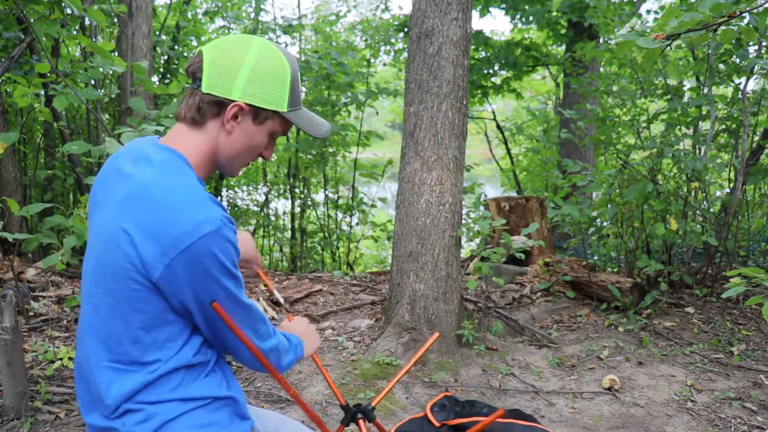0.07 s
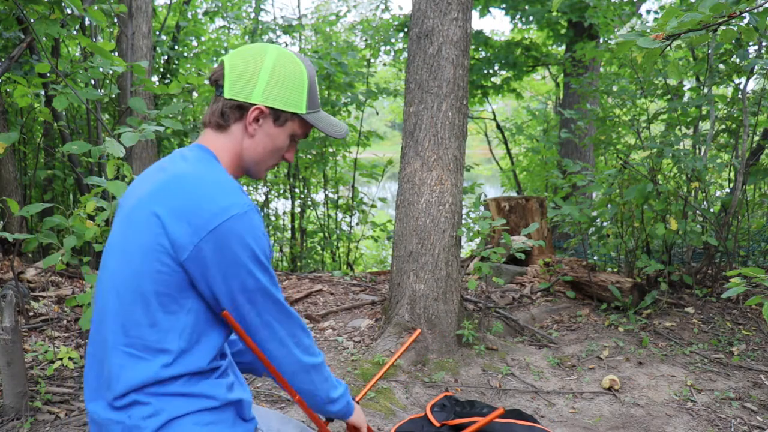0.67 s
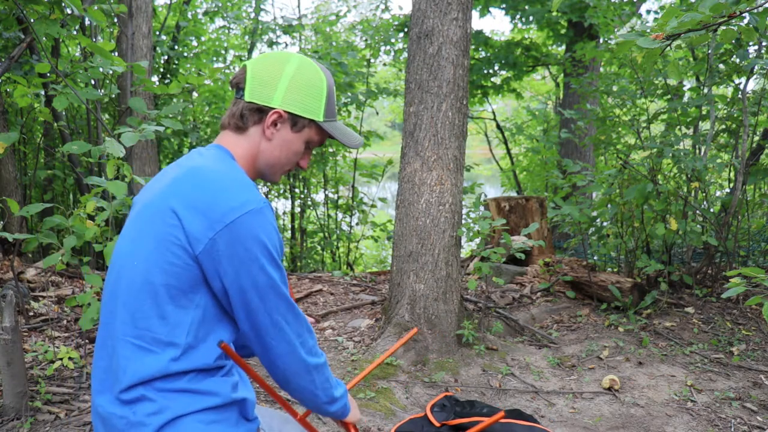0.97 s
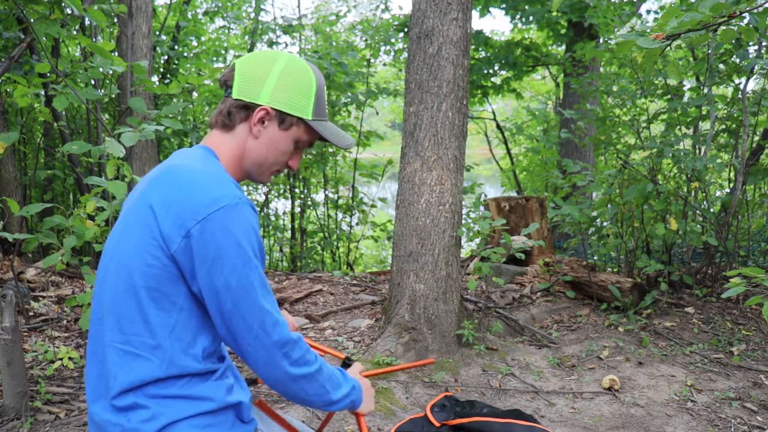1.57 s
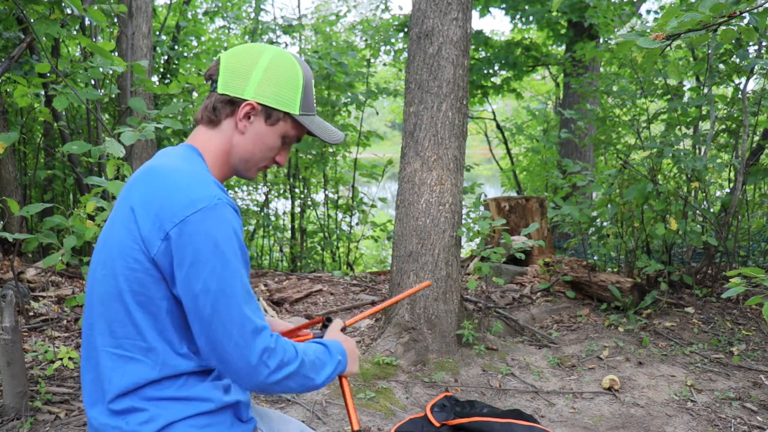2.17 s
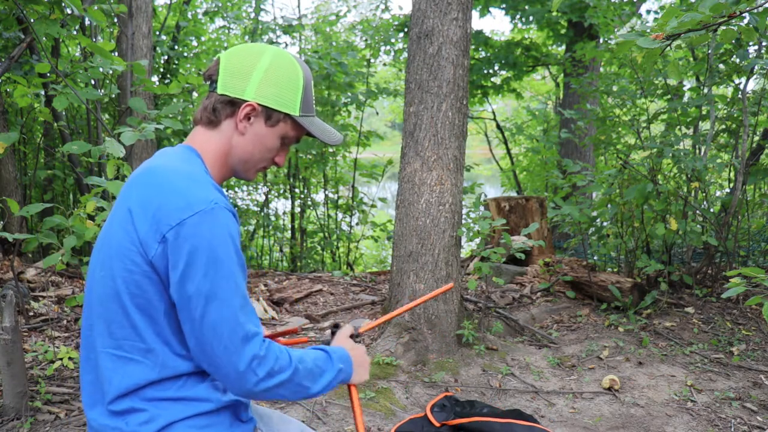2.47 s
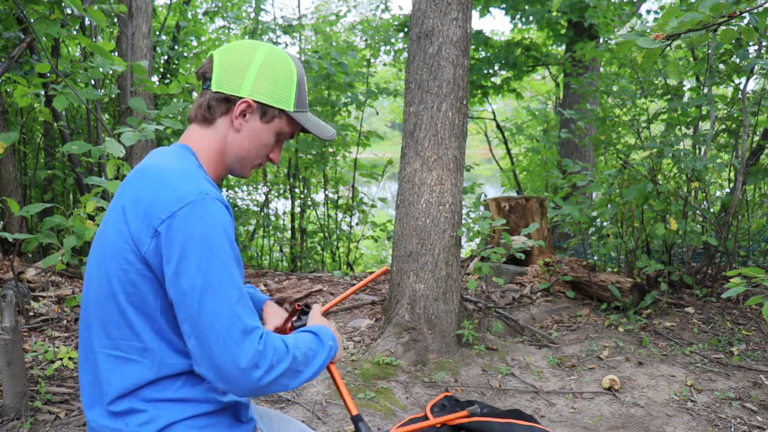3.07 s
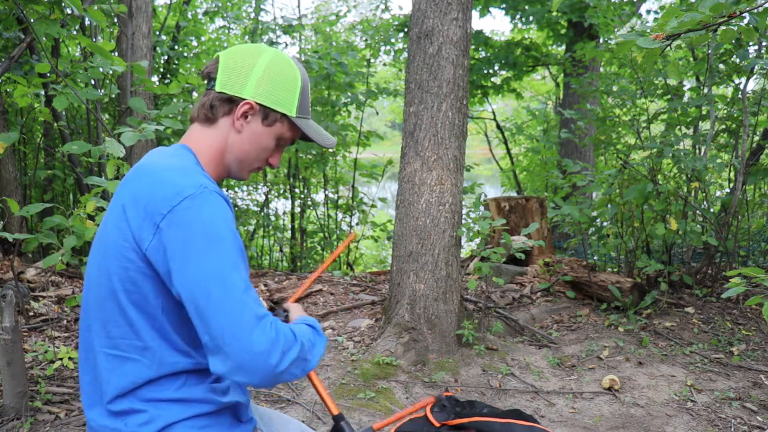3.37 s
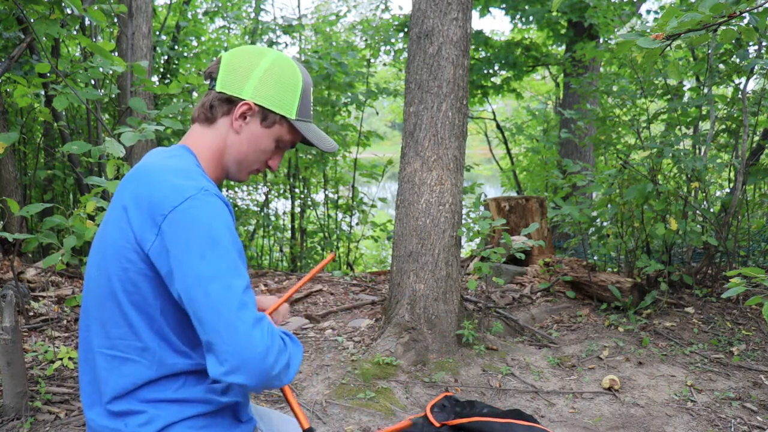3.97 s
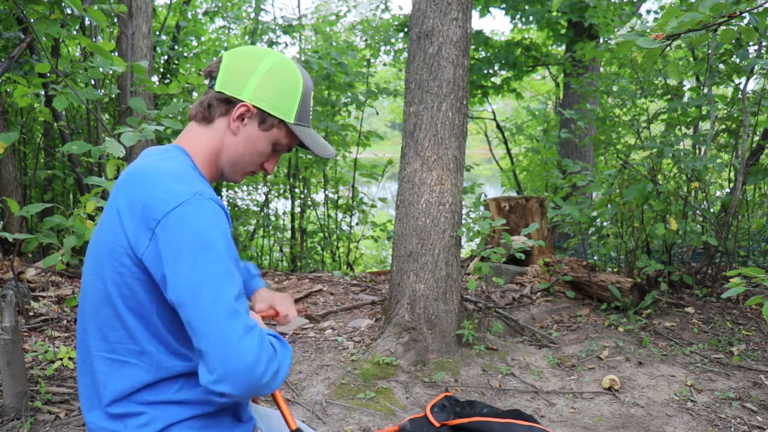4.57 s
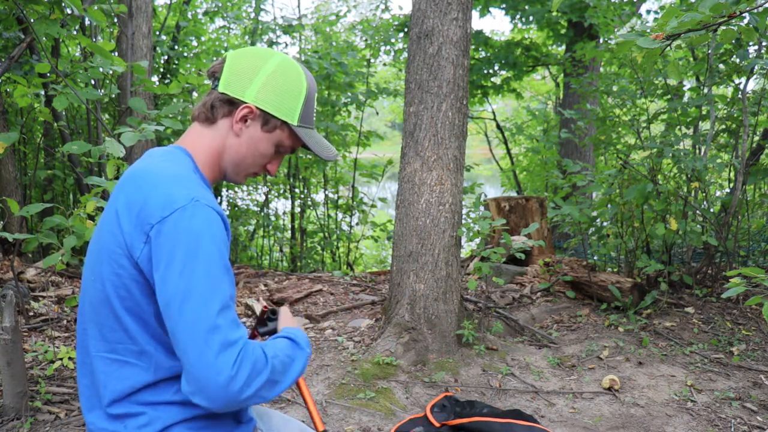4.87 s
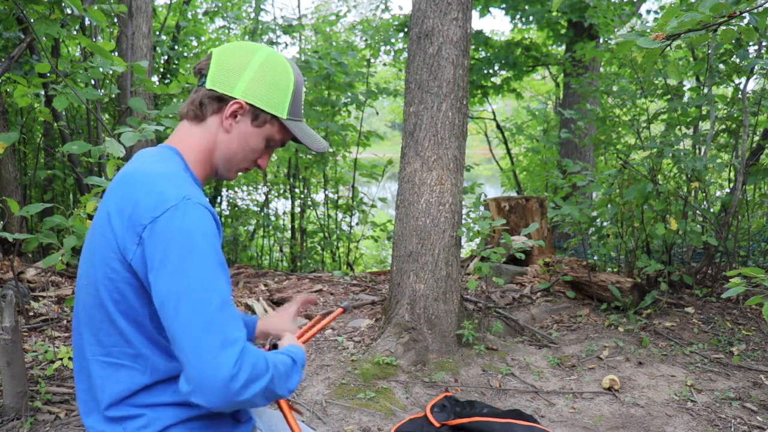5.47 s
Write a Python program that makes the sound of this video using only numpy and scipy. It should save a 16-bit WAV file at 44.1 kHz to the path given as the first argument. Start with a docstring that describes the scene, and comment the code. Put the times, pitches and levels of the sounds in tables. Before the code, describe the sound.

Hollow metal chair tubes clack, click and slide in plastic joints close by, over hushed trees and faint distant traffic.

```python
"""Folding chair frame in a wood

Shock-corded aluminium tubes slide out of their plastic hubs and clack together close by. Impact
excites their bending modes and the hollow hubs; friction rubs and squeaks, air columns hoot and loose
joints rattle. Trunks scatter each sound back. A far engine and tyres drone under the hush of the
trees, and the loudest blows overload the recorder."""
import sys
import numpy as np
from scipy import signal
from scipy.fft import rfft, irfft
from scipy.io import wavfile
from scipy.ndimage import uniform_filter1d

SR = 44100
rng = np.random.default_rng(int(sys.argv[2]) if len(sys.argv) > 2 else 0)


def wrap_up_sound(samples):
    """Save the sound to the file named by the first command line argument, as 16-bit audio."""
    columns = np.atleast_2d(samples).T
    # keep every value between -1 and 1, then stretch to whole-number steps
    tamed = np.clip(columns, -1, 1)
    steps = np.round(tamed * 32767).astype(np.int16)
    wavfile.write(sys.argv[1], SR, steps)


N = 247401
TIME = np.arange(N) / SR

# spectra of the three parts of a blow: f/Hz, relative level/dB
CRACK_SPECTRUM = [(200, -29), (1000, -14), (1700, 3), (2600, 4), (3200, 1.5), (4300, 3), (6100, 2),
                  (8000, -5.5), (11000, -12.5), (16000, -25)]
TICK_SPECTRUM = [(2000, -54), (6000, -23), (8000, 11.5), (9900, 12), (11000, -9), (13000, 1.5),
                 (16000, -38)]
KNOCK_SPECTRUM = [(40, -57), (260, -71), (400, -10.5), (600, 0), (800, -5.5), (920, -4.5), (1150, -4),
                  (1700, -7), (3000, -16.5), (8000, -61)]
# blows, and at 1.1487 s a faint, thin, very high click:
# t/s, level/dB, relative hub knock/dB, spot f/Hz, relative tube ring/dB
TRANSIENTS = [(0.2255, -23, -13, 5520, -12), (0.27, -27, -12, 2770, -7), (0.4178, -1.5, -8, 4273, 12.5),
              (0.4215, 0, -17, 5150, -1), (0.4304, -4, -8.5, 6780, -6), (0.6033, -31, -11, 6000, 16),
              (0.7618, -18.5, -16, 5170, -15), (0.77, -23, -10, 4850, 9.5), (1.067, -26.5, -3, 2850, -16),
              (1.1487, -35.5, -20, 9100, 0), (1.287, -36, -14, 3520, -13), (1.4345, -17.5, -4, 3420, -1),
              (1.4440, -14.5, -2, 4130, 3), (1.4596, -26.5, 5, 2570, -1), (1.4669, -20, -3, 2230, -9),
              (1.4974, -22, -11, 2440, -2), (1.5272, -18, -5.5, 3330, 2), (1.6554, -7, -5, 5820, -17),
              (1.6601, -15.5, -6.5, 5000, 6), (1.893, -15.5, -7.5, 3606, -4), (2.0546, -27, 2.5, 2420, -6),
              (2.0764, -9, -18, 6930, 4.5), (2.195, -21.5, -8, 3120, 10.5), (2.7687, -19.5, -18, 4150, 10),
              (2.7784, -11.5, -5.5, 3250, 3), (2.9343, -15.5, -4, 4310, 11), (3.1211, -20.5, -4, 4370, -8),
              (3.1784, -3, -35, 5780, 11), (3.2023, -1, -12, 5840, -17), (3.28, -10.5, -23, 6000, -8),
              (3.3142, -12.5, -21, 6300, -4), (3.346, -19.5, -6.5, 5900, -7), (3.364, -11, -25, 6000, 9),
              (3.4257, -21, -9.5, 3900, 12), (3.5237, -20, -6.5, 3990, 11), (3.963, -26.5, -5, 6000, 14.5),
              (3.994, -8, -16.5, 6900, 10), (4.0673, -6.5, 3, 2660, -12), (4.1195, -10.5, -6, 4830, 10),
              (4.1384, -10, 5, 4420, -16), (4.367, -23.5, 7, 2300, 17), (4.4284, -11, -6.5, 5970, 3),
              (4.4788, -16, -6, 4670, 15.5), (4.6591, -2, 6, 2490, -17), (4.6777, 3, -9, 6800, 13),
              (4.8602, -2.5, -11, 5190, 7), (4.8976, -8, -17, 3630, -3), (5.012, -22.5, -13, 3006, -9),
              (5.0601, -13.5, -6.5, 4410, 2.5), (5.198, -13, -44, 4260, 8.5),
              (5.3312, -25.5, -8, 6450, -12)]
def clacks_and_click(crack_t60=0.019, knock_t60=0.023, spot_t60=0.012, rise_s=0.0011, mid_spot_hz=4560):
    """Impact excitation: a blow is a hand-damped crack and tick, a hollow knock and a ring of tubes."""
    out, t = np.zeros(N), np.arange(16384) / SR
    for start, db, knock_db, hz, ring_db in TRANSIENTS:
        # a freer ring and a higher-pitched spot make a brighter sound
        tick_db = -15 + 0.8 * ring_db + 8.5 * np.log2(hz / mid_spot_hz)
        # modes near the spot's pitch speak most
        near_spot = [(f, level - 3 * abs(np.log2(f / hz))) for f, level in CRACK_SPECTRUM]
        crack = amp(4) * burst(near_spot, t, crack_t60)
        tick = amp(tick_db) * burst(TICK_SPECTRUM, t, crack_t60)
        knock = amp(knock_db + 3) * burst(KNOCK_SPECTRUM, t, knock_t60)
        spot = amp(11 - 60 * t / spot_t60) * np.sin(2 * np.pi * hz * t)
        ring = amp(ring_db - 23) * tube_ring(t, hz, tick_db)
        onset = 1 - np.exp(-t / rise_s)
        add(out, start, amp(db) * onset * (crack + tick + knock + spot + ring))
    return out


# mode clusters of the tubes, the upper ones strong only in sharp blows: f/Hz, relative level/dB
LOWER_MODES = [(2616, -2.5), (3596, -1.5), (4230, -5), (4450, 1.5), (5100, -3.5), (5770, 1), (6790, -0.5),
               (7900, -4)]
UPPER_MODES = [(8100, 5.5), (9730, 0.5), (11150, -4), (13020, -8)]
# decay of the clusters: lower T60/s, upper T60/s
MODE_T60 = (0.25, 0.16)
def tube_ring(t, spot_hz, upper_db, detune=0.03, note_t60=0.43):
    """Free vibration: each tube and grip shifts and reweights the modes; the struck tube adds a note."""
    shifts = 1 + detune * rng.uniform(-1, 1, len(LOWER_MODES))
    grip_db = rng.uniform(-4, 4, len(LOWER_MODES))
    modes = [(f * shift, db + grip - 1.5 * abs(np.log2(f / spot_hz)))
             for (f, db), shift, grip in zip(LOWER_MODES, shifts, grip_db)]
    note = mode_clusters([(spot_hz, 0)], len(t), width_hz=130) * amp(-11 - 60 * t / note_t60)
    lower = mode_clusters(modes, len(t), width_hz=420) * amp(-60 * t / MODE_T60[0])
    upper = mode_clusters(UPPER_MODES, len(t), width_hz=800) * amp(upper_db - 60 * t / MODE_T60[1])
    return note + lower + upper


# strokes of a tube in its socket: peak t/s, level/dB, swell and fade time/s, centre f/Hz
STROKES = [(0.198, -20.5, 0.0058, 5160), (1.038, -27, 0.013, 3700), (1.45, -29.5, 0.026, 3850),
           (1.605, -23, 0.0037, 4600), (2.281, -30, .014, 3420), (2.343, -18, 0.0037, 3130),
           (2.571, -27, 0.014, 4240), (2.776, -22, 0.0032, 4570), (2.921, -16.5, 0.01, 4430),
           (3.404, -25.5, 0.032, 4717), (3.755, -36.5, .035, 3340), (3.885, -25.5, 0.01, 4070),
           (4.143, -35, 0.039, 4000), (4.509, -28.5, .018, 4900), (4.608, -29.5, 0.012, 2980),
           (4.685, -5, 0.0087, 10000), (5.038, -29.5, .016, 2900), (5.317, -30.5, 0.011, 4250),
           (5.507, -24.5, 0.0082, 3900), (5.576, -27, 0.037, 3250)]
def slides(grit_db=3.0, resonance_db=4.0, half_width_octaves=0.83, top_hz=11500):
    """Sliding friction: the metal catches in tiny slips, which excite the resonances of the joint."""
    out, t = np.zeros(N), np.arange(16384) / SR
    middle, f = t[-1] / 2, np.fft.rfftfreq(len(t), 1 / SR)
    for peak, db, swell, hz in STROKES:
        slips = rng.standard_normal(len(t)) * amp(grit_db * lumps(len(t), size=60))
        resonances = amp(resonance_db * lumps(len(f), size=110))
        band = (1 + (np.log2((f + 1) / hz) / half_width_octaves) ** 4) ** -0.6
        roll_off = (1 + (f / top_hz) ** 8) ** -0.5
        stroke = 1 / np.cosh((t - middle) / swell)  # the hand speeds up and slows down evenly
        rub = stroke * irfft(rfft(slips) * resonances * band * roll_off)
        add(out, peak - middle, amp(db) * rub * np.linalg.norm(stroke) / np.linalg.norm(rub))
    return out


# squeaks of tube ends, then at 2.076 s and 3.278 s brief high metallic pings on the blows:
# t/s, duration/s, f/Hz, level/dB
BRIEF_TONES = [(0.418, .01, 9750, -2), (0.419, .008, 13050, -9), (1.495, .015, 2290, -21),
               (1.495, .013, 5100, -24), (2.076, .004, 9900, -14), (3.278, .006, 6100, -9)]
def squeaks_and_pings(waver=0.0091):
    """Tone bursts: stick-slip squeaks of a tube end in its socket, and high metallic pings on blows."""
    out = np.zeros(N)
    for start, duration, hz, db in BRIEF_TONES:
        size = int(duration * SR)
        cycles = np.cumsum(hz * (1 + waver * drift(310)[:size])) / SR
        add(out, start, amp(db) * np.sqrt(2) * np.hanning(size) * np.sin(2 * np.pi * cycles))
    return out


# notes of the air in the tubes: t/s, f/Hz, level/dB, T60/s
AIR_NOTES = [(1.445, 325, -18, 0.041), (3.179, 812, -12, 0.05), (4.065, 337, -21.5, 0.2),
             (4.137, 330, -28.5, 0.15), (4.48, 490, -20, 0.077)]
def hoots():
    """Air-column resonance: an open tube sounds a short hollow note when a joint pops."""
    out, t = np.zeros(N), np.arange(SR // 4) / SR
    for start, hz, db, t60 in AIR_NOTES:
        add(out, start, amp(db - 60 * t / t60) * np.sin(2 * np.pi * hz * t))
    return out


def rattle(contacts_per_s=260, settle_s=0.048, t60=0.0097):
    """Intermittent contact: loose joints chatter in proportion to each transient and slide."""
    jolts = sum(amp(db) * (TIME > s) * np.exp(-abs(TIME - s) / settle_s) for s, db, *_ in TRANSIENTS)
    rubs = sum(amp(db + 5) * np.exp(-abs(TIME - s) / swell) for s, db, swell, _ in STROKES)
    shaking = np.minimum(jolts + rubs, 0.5)
    contacts = (rng.random(N) < contacts_per_s / SR) * rng.random(N) * shaking
    t = np.arange(1024) / SR
    envelope = signal.oaconvolve(contacts, amp(-16.5 - 60 * t / t60))[:N]
    return envelope * dense_modes(CRACK_SPECTRUM, N)


# echo from trunks and leaves: f/Hz, relative level/dB
ECHO_SPECTRUM = [(100, -3), (600, -12.5), (1800, 3), (4000, 3.5), (8000, 0), (12000, -2.5), (16000, 13.5)]
# decay of that echo: f/Hz, T60/s
ECHO_T60 = [(300, 0.51), (2000, 0.096), (5000, 0.22), (9000, 0.35), (15000, 0.1)]
def woods(direct, scatter_db=-9.5, echoes_per_s=3000, ground_db=-15.5, ground_s=0.0065):
    """Reflection and scattering: one bounce off the ground, a thin bright tail off trunks and leaves."""
    echoes = rng.standard_normal(SR) * (rng.random(SR) < echoes_per_s / SR)
    echoes[:round(0.006 * SR)] = 0  # delay of the first echo
    hz, t, bands = signal.stft(echoes, SR, nperseg=256)
    decay_db = -60 * t / read(ECHO_T60, hz)[:, None]
    bands = bands * amp(read(ECHO_SPECTRUM, hz)[:, None] + decay_db)
    response = signal.istft(bands, SR, nperseg=256)[1]
    response *= amp(scatter_db) / np.linalg.norm(response)
    response[round(ground_s * SR)] += amp(ground_db)
    return direct + signal.fftconvolve(direct, response)[:N]


# hush of the trees: f/Hz, relative level/dB
HUSH_SPECTRUM = [(15, -46), (25, -4.5), (113, 3.5), (152, -0.5), (379, -12.5), (851, -6), (1000, -10.5),
                 (1540, -8.5), (2570, -21.5), (4770, -16), (5750, -20), (15600, -35.5)]
def trees(level_db=-40.5, sway_db=0.6):
    """Amplitude-modulated noise: the broadband hush of the trees sways slightly in level."""
    return amp(level_db + sway_db * drift(4.38)) * dense_modes(HUSH_SPECTRUM, N)


# swell of far traffic: t/s, level/dB
TRAFFIC_SWELL = [(0, -56), (1.5, -46.5), (2.5, -41), (4.4, -41.5), (5.0, -38.5), (5.61, -35)]
# tyre noise: f/Hz, relative level/dB
TYRE_SPECTRUM = [(100, -24), (350, -3.5), (600, 5.5), (850, 6), (1600, -4), (2300, -8), (5000, -38)]
def tyres():
    """Rolling noise: far tyres give a mid-frequency band that slowly grows louder."""
    level_db = np.interp(TIME, *np.transpose(TRAFFIC_SWELL)) - 0.5
    return amp(level_db) * dense_modes(TYRE_SPECTRUM, N)


# course of the far engine: t/s, cycle f/Hz, level/dB
ENGINE_RUN = [(0, 57.4, -53), (0.599, 52.57, -45.5), (1.1, 47.76, -47.5), (2.2, 42.57, -55.5),
              (2.8, 45.63, -46.5), (3.6, 49.4, -45), (4.3, 51.05, -42.5), (4.7, 55.7, -43),
              (5.61, 56.4, -41.5)]
# its harmonics: multiple of the cycle frequency, relative level/dB
ENGINE_ORDERS = [(2, 3.5), (3, -1.5), (4, -30), (5, -13.5)]
def engine(waver=0.00714, throb_db=2.0):
    """Harmonic series: the orders follow the cycle rate as the engine slows and picks up again."""
    times, hz, db = np.transpose(ENGINE_RUN)
    cycles = np.cumsum(np.interp(TIME, times, hz) * (1 + waver * drift(9))) / SR
    drone = np.zeros(N)
    for order, order_db in ENGINE_ORDERS:
        throb = amp(order_db + throb_db * drift(4.2))
        drone += throb * np.sin(2 * np.pi * (order * cycles + rng.random()))
    return amp(np.interp(TIME, times, db)) * drone


def burst(spectrum, t, t60, contact_s=0.00083):
    """Damped vibration: dense modes hold during contact, then decay; the envelope sets the energy."""
    envelope = amp(-60 * np.maximum(t - contact_s, 0) / t60)
    sound = dense_modes(spectrum, len(t)) * envelope
    return sound * np.linalg.norm(envelope) / np.linalg.norm(sound)


def dense_modes(spectrum, size):
    """Modal overlap: countless modes of random phase merge into noise of rms 1 under one spectrum."""
    hz = np.fft.rfftfreq(size, 1 / SR)
    return unit(irfft(amp(read(spectrum, hz)) * np.exp(2j * np.pi * rng.random(len(hz))), size))


def mode_clusters(modes, size, width_hz):
    """Beating: close modes interfere in clusters, each about width_hz wide."""
    hz = np.fft.rfftfreq(size, 1 / SR)
    power = sum(amp(db) ** 2 / (1 + (2 * (hz - f) / width_hz) ** 2) ** 1.45 for f, db in modes)
    return unit(irfft(np.sqrt(power) * np.exp(2j * np.pi * rng.random(len(hz))), size))


def drift(per_s):
    """Random modulation of rms 1, passing through per_s new values a second."""
    knots = rng.standard_normal(2048)
    return unit(np.interp(TIME * per_s, np.arange(len(knots)), knots))


def lumps(length, size):
    """Smoothed noise of rms 1, each rise or dip about size steps wide."""
    return unit(uniform_filter1d(uniform_filter1d(rng.standard_normal(length), size), size))


def amp(db):
    """Amplitude ratio of a level in decibels."""
    return 10 ** (np.asarray(db) / 20)


def unit(x):
    """Normalisation to rms 1."""
    return x / np.sqrt(np.mean(x ** 2) + 1e-20)


def read(points, hz):
    """Interpolation of a (f/Hz, value) table on a log-frequency axis."""
    f, value = np.transpose(points)
    return np.interp(np.log(hz + 1), np.log(f + 1), value)


def add(mix, start, sound):
    """Superposition of a sound on the mix, from start seconds on."""
    part = mix[max(round(start * SR), 0):][:len(sound)]
    part += sound[:len(part)]


def scene():
    """Superposition: the frame and its echoes over the trees and far traffic, in mono."""
    near = clacks_and_click() + slides() + squeaks_and_pings() + hoots() + rattle()
    return (woods(near) + trees() + tyres() + engine())[None]


def record(dry, limit_db=-9.5, recover_db_per_s=81.5, attack_s=0.0059, low_cut_hz=70, top_hz=15900):
    """Overload: a limiter ducks just after loud blows, what escapes clips, and filters trim the band."""
    power = signal.lfilter(np.ones(64) / 64, [1], dry[0] ** 2)
    over_db = np.maximum(10 * np.log10(power + 1e-12) - limit_db, 0)
    release_db = TIME * recover_db_per_s
    held_db = np.maximum.accumulate(over_db + release_db) - release_db
    pole = np.exp(-1 / (attack_s * SR))
    duck_db = signal.lfilter([1 - pole], [1, -pole], held_db)
    clipped = np.clip(dry * amp(-duck_db), -1, 1)
    wind_filter = signal.butter(1, low_cut_hz, "high", fs=SR)
    band_limit = signal.firwin(255, top_hz, window=("kaiser", 7), fs=SR)
    return signal.oaconvolve(signal.lfilter(*wind_filter, clipped), band_limit[None], "same")


dry = scene()
out = record(dry)
wrap_up_sound(out)
```